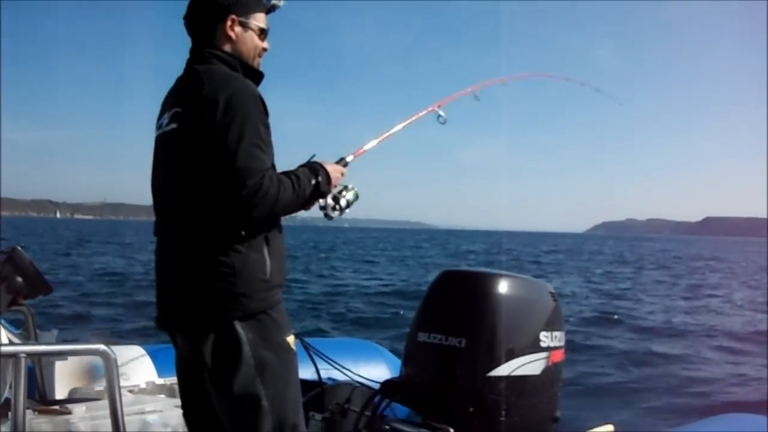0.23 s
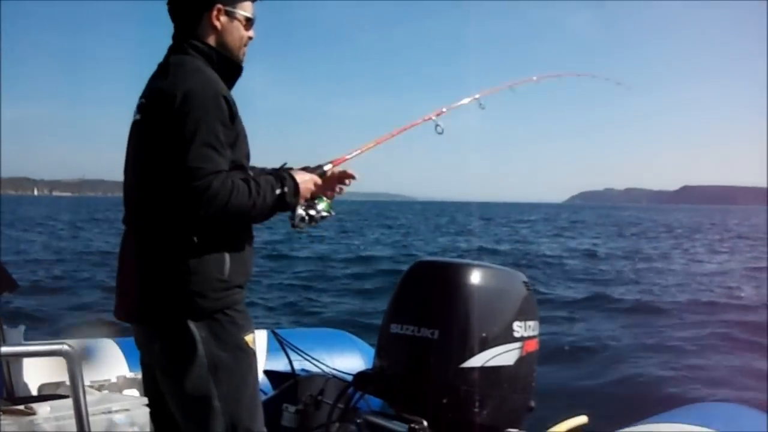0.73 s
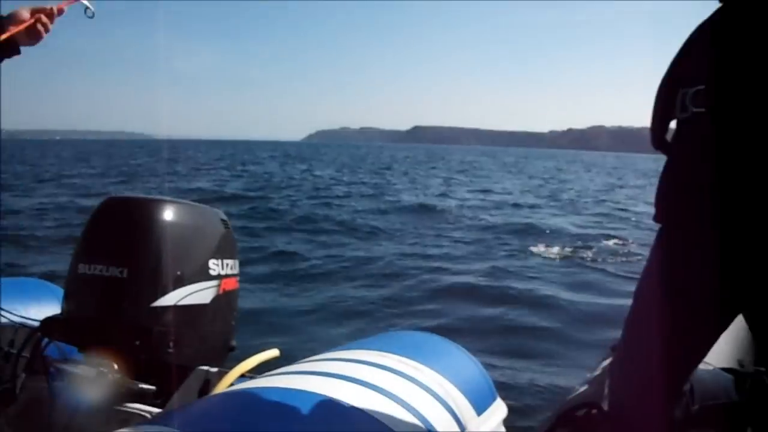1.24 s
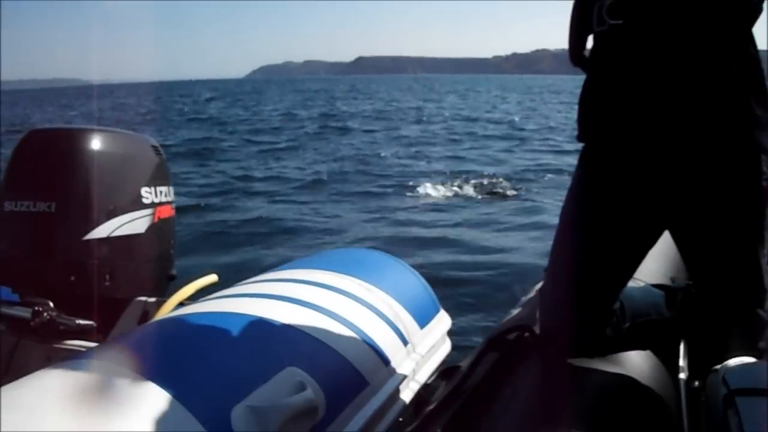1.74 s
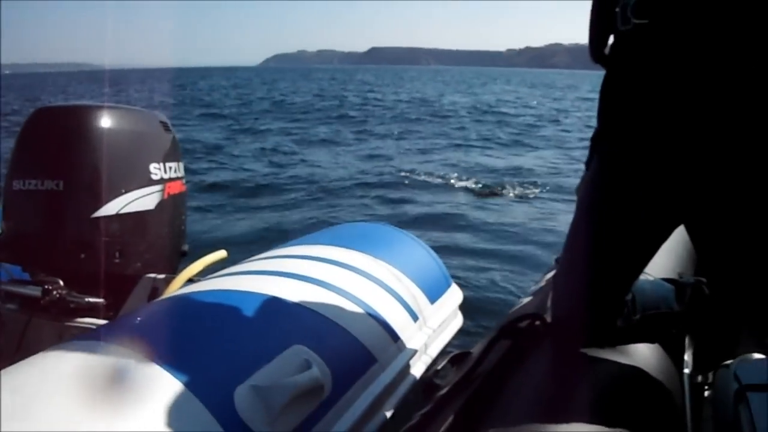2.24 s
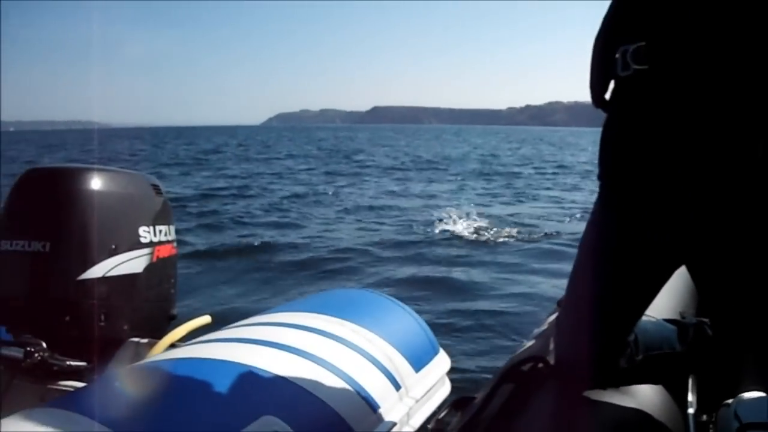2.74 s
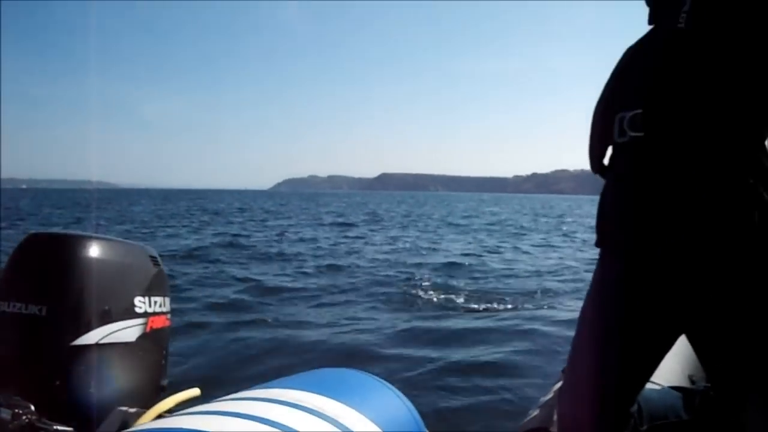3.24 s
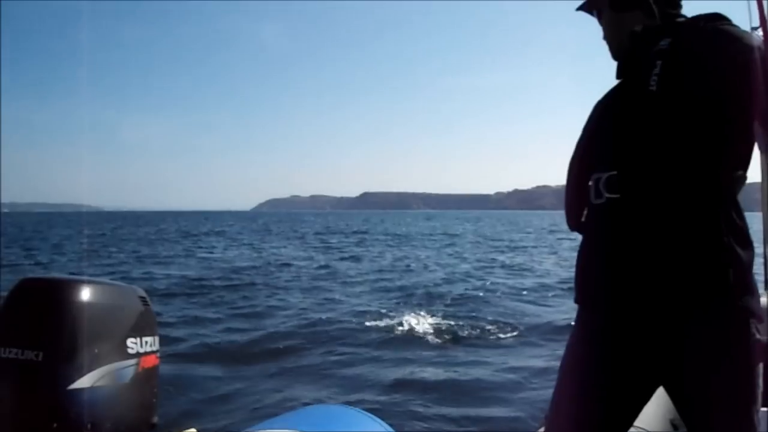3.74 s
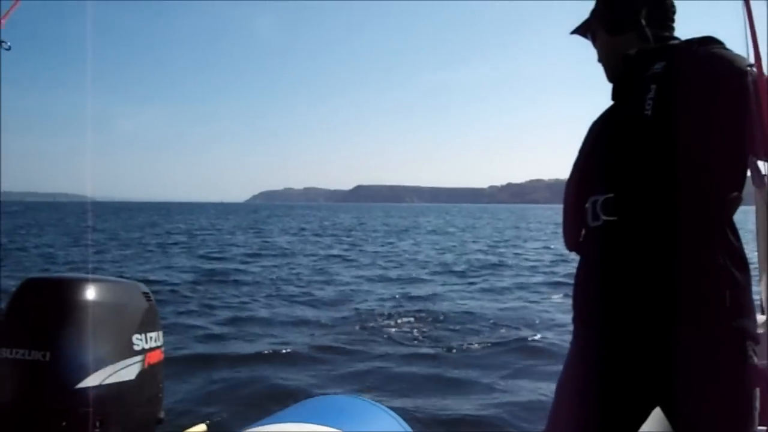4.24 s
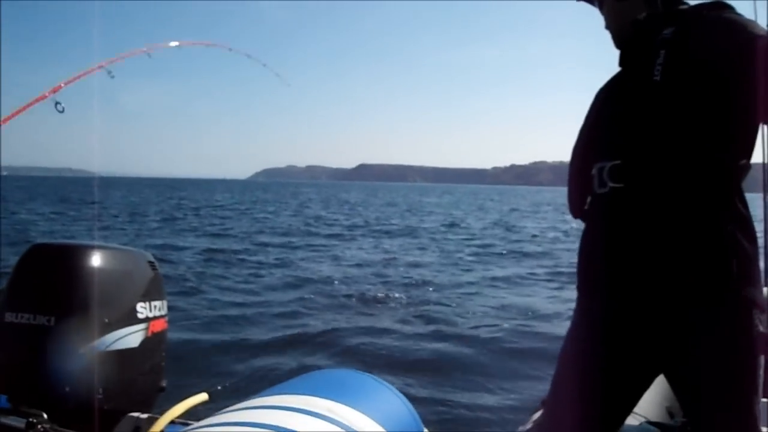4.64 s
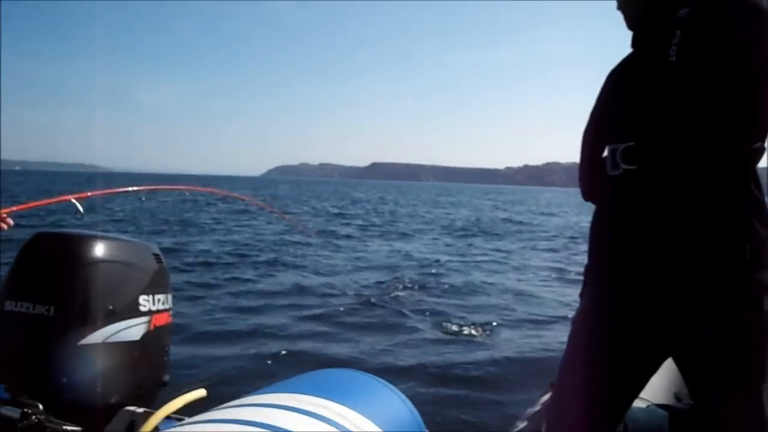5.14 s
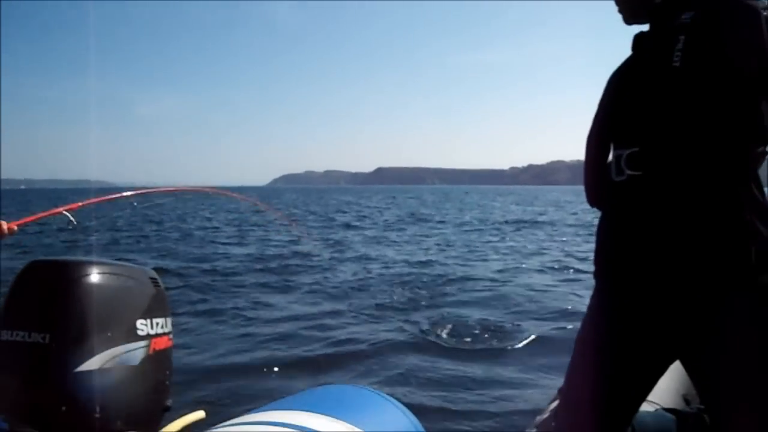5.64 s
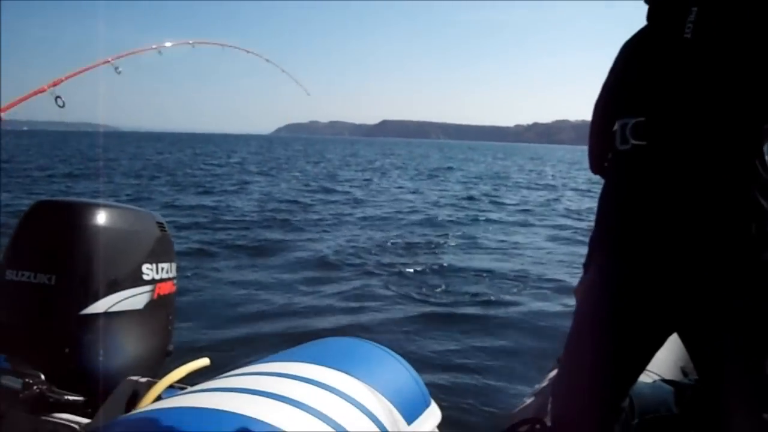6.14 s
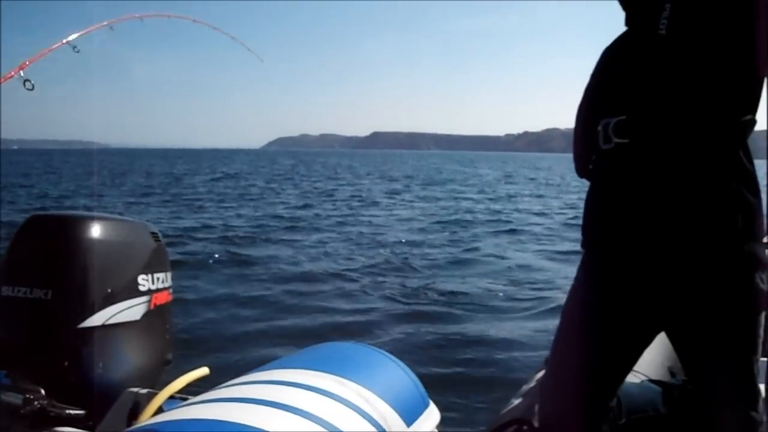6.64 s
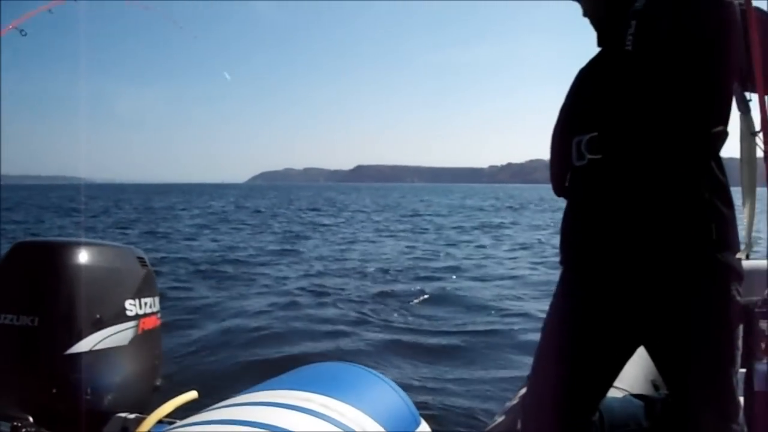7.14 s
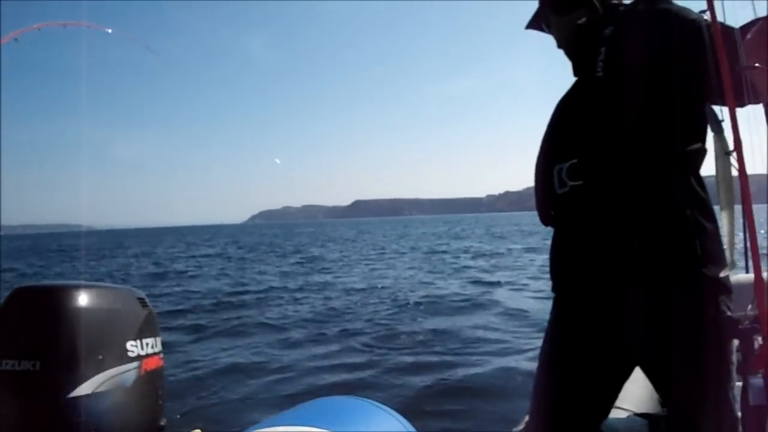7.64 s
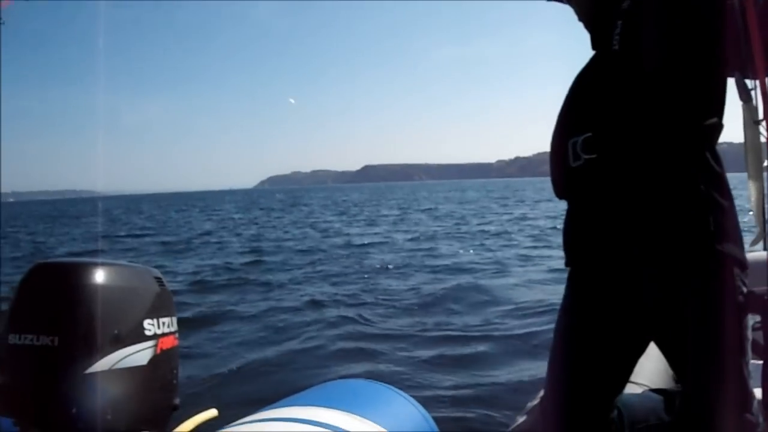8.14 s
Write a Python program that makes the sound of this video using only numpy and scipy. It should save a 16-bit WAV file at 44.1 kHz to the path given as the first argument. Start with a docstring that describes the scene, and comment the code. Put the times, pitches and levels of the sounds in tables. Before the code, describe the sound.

Mono handheld camera sound aboard a rubber boat: crisp, wet smacks and dense fizzy wash, occasional soft hollow thumps, and a cluster of clipping cracks early on that briefly makes the level duck. Later a second strong splash, gliding bubble blips, and a reel's drag buzzing twice. Sparse drips and laps close it, over light wind rumble, hiss and wavering electronic whine.

```python
"""Sharp smacks, fizzing wash, dull thumps and a reel that ratchets twice: chop slaps a small inflatable boat.
Noise grains ring many bands for the wash; noise bursts ring trapped air for the smacks; cracks are brief noise.
Bubbles are gliding sines, thumps low sines with a puff, the reel pawl ticks and hiss through resonances.
The small camera adds thin whines, hum and hiss; its gain control ducks after the loudest peaks."""
import sys
import numpy as np
from scipy import signal
from scipy.fft import rfft, irfft
from scipy.io import wavfile
from scipy.ndimage import minimum_filter1d

SR = 44100
rng = np.random.default_rng(int(sys.argv[2]) if len(sys.argv) > 2 else 0)


def dump_mix(stems):
    """Bounce the given channels to the path in sys.argv[1] as a 16-bit WAV at rate SR."""
    frames = np.atleast_2d(stems).T  # one column per channel
    limited = np.clip(frames, -1, 1)  # hard clip at full scale
    pcm = np.round(limited * 32767).astype(np.int16)
    wavfile.write(sys.argv[1], SR, pcm)


N = 369999
T = np.arange(N) / SR   # time [s]


def from_db(db):
    """Amplitude factor of a level in dB."""
    return 10 ** (np.asarray(db) / 20)


def rms_one(x):
    """Scales a signal to rms 1."""
    return x / np.sqrt(np.mean(x ** 2) + 1e-20)


def in_time(rows):
    """Columns of a curve, sample by sample."""
    s, *columns = np.transpose(rows)
    return [np.interp(T, s, column) for column in columns]


def at_hz(points, hz):
    """Reads a spectrum in dB, interpolated along log frequency."""
    points = np.array(points)
    return np.interp(np.log(hz), np.log(points[:, 0]), points[:, 1])


def drift(rate_hz):
    """Slow chance: noise at every 40th sample through a double one-pole low-pass; spread 1."""
    r = np.exp(-80 * np.pi * rate_hz / SR)
    noise = rng.standard_normal(N // 40 + 2002)
    slow = signal.lfilter([1], [1, -2 * r, r * r], noise)[2000:]   # settled part
    return np.interp(np.arange(N) / 40, np.arange(len(slow)), rms_one(slow))


def resonance(x, hz, width_hz):
    """Two-pole peak of gain 1."""
    r = np.exp(-np.pi * width_hz / SR)
    poles = [1, -2 * r * np.cos(2 * np.pi * hz / SR), r * r]
    return signal.lfilter([(1 - r * r) / 2, 0, (r * r - 1) / 2], poles, x)


def coloured(spectrum, white):
    """A signal given the colour of a spectrum; rms 1."""
    hz = np.maximum(np.fft.rfftfreq(N, 1 / SR), 1)
    return rms_one(irfft(rfft(white) * from_db(at_hz(spectrum, hz)), N))


def sine(hz):
    """A sine of rms 1 that follows a pitch curve from a random phase."""
    phase = 2 * np.pi * np.cumsum(hz + 0 * T) / SR
    return np.sqrt(2) * np.sin(phase + rng.uniform(0, 2 * np.pi))


def grains(per_s, spread_db):
    """Random clicks of very uneven size and either sign."""
    sizes = from_db(spread_db * np.minimum(rng.exponential(1, N), 5)) * rng.choice([-1, 1], N)
    return sizes * (rng.random(N) < per_s / SR) + 1e-18


def add(track, s, db, sound):
    """Lays a sound on the track, scaled to a peak level."""
    at = round(s * SR)
    track[at:at + len(sound)] += (from_db(db) * sound / np.abs(sound).max())[:N - at]


def smacks():
    """The blow and a dying burst of noise ring the pocket of trapped air and its overtone."""
    # smacks and drops: (time [s], peak level [dB], pitch [Hz], main burst t60 [s])
    smack_rows = [(0.1753, -18.5, 3590, 0.089), (0.6314, -14.5, 2580, 0.022), (0.839, -27, 2590, 0.029),
                  (0.914, -22.5, 2520, 0.021), (0.9793, -18.5, 2380, 0.048), (1.181, -17.5, 3850, 0.053),
                  (1.1985, -20, 3540, 0.022), (1.232, -22, 4200, 0.025), (1.3363, -24, 3150, 0.03),
                  (1.432, -23, 3920, 0.017), (1.6074, -31, 2050, 0.025), (1.665, -25, 3580, 0.027),
                  (1.7889, -25, 4200, 0.025), (1.8457, -25, 3000, 0.025), (1.8593, -20, 3100, 0.039),
                  (1.881, -14.5, 2600, 0.032), (2.0231, -8.5, 3140, 0.018), (2.0595, -13, 2600, 0.019),
                  (2.2034, -37, 2200, 0.022), (2.2172, 2.5, 4400, 0.0083), (2.3197, -29, 2020, 0.036),
                  (2.321, -6, 2380, 0.017), (2.797, -18, 2600, 0.031), (3.0073, -18.5, 2730, 0.025),
                  (3.1566, -23, 2870, 0.025), (3.267, -26, 2870, 0.02), (3.294, -14.5, 2960, 0.019),
                  (3.49, -21, 3250, 0.021), (3.6716, -25, 3840, 0.025), (3.709, -17, 3140, 0.025),
                  (3.7312, -24, 3200, 0.025), (3.7543, -15, 2620, 0.018), (3.7679, -11, 2640, 0.02),
                  (3.8068, -21, 2800, 0.025), (3.8724, -21, 2890, 0.025), (3.8948, -18, 3130, 0.034),
                  (3.9086, -14.5, 2670, 0.045), (3.942, -16.5, 2540, 0.025), (3.9923, -22, 2710, 0.036),
                  (4.5059, -11.5, 3700, 0.057), (4.5486, -11.5, 3500, 0.034), (4.59, -17.5, 2300, 0.041),
                  (4.65, -18, 3250, 0.029), (4.7355, -1.5, 3810, 0.015), (4.8152, -24, 4000, 0.029),
                  (4.9736, -27, 3130, 0.029), (5.0835, -20, 3050, 0.017), (5.1023, -19, 3280, 0.018),
                  (5.1486, -20, 4100, 0.039), (5.2355, -25, 2580, 0.05), (5.247, -17, 4170, 0.032),
                  (5.273, -25, 5200, .015), (5.283, -28, 4900, 0.014), (5.318, -24, 2770, 0.03),
                  (5.3926, -9, 3920, 0.06), (5.481, -15.5, 3820, 0.04), (5.599, -24.5, 1820, 0.02),
                  (5.7308, -23.5, 2940, 0.022), (5.8018, -24, 4480, 0.094), (5.849, -11.5, 2580, 0.034),
                  (6.073, -26, 2510, 0.032), (6.3991, -22, 2630, 0.062), (6.6498, -19, 2900, 0.029),
                  (7.2842, -18, 2200, 0.017), (7.3128, -29, 3100, 0.025), (7.336, -32, 2500, .015),
                  (7.347, -25.5, 2300, .015), (7.4078, -14.5, 2700, 0.014), (7.62, -31.5, 3400, .03),
                  (7.661, -27, 3600, .04), (7.8408, -25, 2580, 0.034), (7.9816, -24, 2170, 0.014),
                  (8.011, -30, 3100, .02), (8.05, -30, 4600, .02), (8.1378, -28, 3050, 0.028),
                  (8.18, -23, 4060, 0.022)]
    out, t = np.zeros(N), T[:4000]
    for (s, db, hz, t60), noise in zip(smack_rows, rng.standard_normal((len(smack_rows), 4000))):
        decay = from_db(-60 * t / t60) + 0.083 * from_db(-60 * t / 0.099)   # main burst and faint tail
        burst = noise * np.minimum(t / 0.0012, 1) * decay
        burst[20] += 6.0   # the blow
        low = resonance(resonance(burst, hz, hz / 3.35), hz, hz / 4.4)
        overtone_hz = 1.54 * hz
        high = resonance(resonance(burst, overtone_hz, hz / 6.8), overtone_hz, hz / 6.8)
        add(out, s, db, low - 0.2 * high)
    return out


def cracks():
    """A few milliseconds of broad noise, coloured around one pitch; stronger cracks last longer."""
    # dry bright cracks: (time [s], peak level [dB], pitch [Hz])
    crack_rows = [(1.9214, -25, 4140), (2.046, -23, 3560), (2.056, -14, 4050), (2.0599, -3, 4700),
                  (2.0674, -14, 3730), (2.0764, -23, 6120), (2.0908, -16, 4370), (2.2177, -2.5, 4350),
                  (2.2287, 0, 3100), (2.2294, -26, 11000), (2.239, -4.5, 5870), (2.2599, -8, 5830),
                  (2.2695, -9.5, 7300), (2.371, -20, 7950), (2.4917, -17.5, 7600), (2.5262, -23, 7950),
                  (2.5605, -17.5, 6560), (2.5679, -25, 7900), (4.5102, -5, 3900), (4.5151, -5, 4000),
                  (4.7356, -28, 3900), (5.7448, -19.5, 6460), (5.8022, -24, 4630), (6.3999, -24, 3650),
                  (6.5344, -24, 7910), (7.662, -32, 7850), (7.9808, -22, 5240), (8.042, -33, 7000),
                  (8.1807, -17, 9100), (8.2856, -27, 4600)]
    out, t = np.zeros(N), T[:1500]
    for (s, db, hz), noise in zip(crack_rows, rng.standard_normal((len(crack_rows), 1500))):
        t60 = 0.0086 + 0.0099 * from_db(db)   # seconds
        burst = noise * from_db(-60 * t / t60)
        broad = resonance(resonance(burst, 6300, 6600), 6300, 6600)
        add(out, s, db, resonance(burst, hz, hz / 5.2) + 0.36 * broad)
    return out


def wash():
    """Small bubbles burst densely, each ringing some cycles; fine spray ticks above them."""
    # lapping along the tubes: (time [s], fizz level [dB])
    lapping = [(0, -41.5), (1.3, -55.5), (2.2, -43.5), (4.3, -52), (5.5, -53), (8.39, -49.5)]
    # relative colour of the bursting bubbles: (frequency [Hz], density [dB per Hz])
    fizz_colour = [(530, -54), (900, -24), (1020, -45), (1630, -5), (2090, -0.5), (2610, 1), (3660, -1.5),
                   (4440, -2.5), (5700, -18.5), (7500, -15), (9750, -56), (16500, -120)]
    # relative colour of the spray: (frequency [Hz], density [dB per Hz])
    spray_colour = [(2940, -27), (5000, -10), (7070, -9), (8090, -3.5), (10600, -9.5), (12100, -10),
                    (15800, -29)]
    fizz_level = surge_level(column=1, base_db=in_time(lapping)[0])
    spray_level = surge_level(column=2, base_db=-52)
    fizz = 0
    for hz in np.geomspace(1100, 6500, num=20):
        clumps = from_db(1.9 * drift(41))   # each band flickers by itself
        bursts = resonance(resonance(grains(400., spread_db=3.5), hz, hz / 15.1), hz, hz / 1.5)
        band_gain = from_db(at_hz(fizz_colour, hz)) * np.sqrt(hz)   # bands widen with pitch
        fizz = fizz + band_gain * rms_one(bursts) * clumps
    together = from_db(1.97 * drift(41))   # flicker shared by fizz and spray
    ticks = rms_one(grains(2500., spread_db=2.5))
    spray = coloured(spray_colour, ticks + .8 * rng.standard_normal(N))
    return together * (fizz_level * rms_one(fizz) + spray_level * spray)


def surge_level(column, base_db):
    """Every wave rises to its crest and falls away; their powers add to the lapping."""
    # waves that break along the tubes; rise and fall each span 10 dB:
    # (crest time [s], fizz level [dB], spray level [dB], rise [s], fall [s])
    surges = [(.18, -43, -46, 0.087, 0.1), (.45, -38, -46, 0.039, 0.14), (.738, -32.5, -41.5, .3, 0.27),
              (1.01, -36.5, -45, 0.066, .1), (1.212, -32.5, -41.5, .08, 0.089),
              (1.492, -39, -48, 0.12, 0.028), (1.63, -40.5, -51, 0.13, 0.16),
              (1.871, -27.5, -39.5, 0.064, 0.076), (2.0, -30, -45, 0.16, 0.083),
              (2.065, -32.5, -36, .05, 0.039), (2.24, -25, -43, 0.0099, 0.028),
              (2.329, -19.5, -51, 0.0094, 0.0063), (2.534, -36.5, -37, 0.066, 0.042),
              (2.78, -36, -50, 0.12, .3), (3.048, -27.5, -44, 0.054, 0.18), (3.39, -41, -58, 0.081, 0.17),
              (3.597, -37, -55, 0.038, .08), (3.756, -30.5, -44, 0.053, 0.23),
              (3.94, -32.5, -42.5, 0.29, 0.3), (4.525, -34.5, -40.5, .06, 0.34),
              (4.79, -35.5, -40.5, 0.066, 0.12), (4.989, -44, -46, 0.045, .06),
              (5.128, -36, -43, 0.1, 0.52), (5.408, -45, -39, 0.068, 0.15), (5.617, -41, -60, 0.03, .06),
              (5.812, -38.5, -48, 0.1, 0.092), (6.415, -44, -46, 0.045, 0.087),
              (6.64, -41.5, -53, 0.11, 0.55), (7.044, -51, -58, 0.048, 0.14),
              (7.308, -43.5, -61, .1, 0.062), (7.872, -44, -55, 0.26, .08),
              (7.992, -43.5, -54, 0.041, 0.065)]
    power = from_db(2 * base_db)   # doubled dB gives power
    for row in surges:
        s, rise, fall = row[0], max(row[3], .005), max(row[4], .005)
        tens_of_db_down = np.maximum((s - T) / rise, (T - s) / fall)
        power = power + from_db(2 * row[column]) * 10 ** -tens_of_db_down
    return np.sqrt(power)


def bubbles():
    """Bubbles ring on as dying, fluttering sines, most of them rising as they near the surface."""
    # (time [s], peak level before flutter [dB], starting pitch [Hz], t60 [s], relative pitch rise [1/s])
    bubble_rows = [(2.798, -27, 1220, 0.031, 4), (3.055, -33, 1160, 0.039, 1.3),
                   (3.94, -29, 1380, 0.033, 3), (4.551, -23, 3400, 0.065, 2), (4.59, -28, 2240, .12, 4),
                   (4.655, -31, 2500, 0.091, 1), (4.662, -35, 3210, 0.054, 1.5),
                   (4.74, -28, 2800, 0.36, 0.8), (4.745, -24, 4700, 0.079, .6),
                   (4.815, -26, 4050, 0.087, 1.5), (4.814, -32, 4700, 0.16, 2.5),
                   (4.558, -34, 2620, .1, -.6), (4.835, -31, 2460, .08, 5), (5.52, -34, 1950, .04, 1.8),
                   (5.617, -31, 2140, .05, 1.8), (5.602, -43, 1760, 0.037, -3), (5.69, -32, 2500, 0.037, 5),
                   (6.075, -29.5, 2650, 0.076, 2), (7.311, -24, 3090, 0.045, 1.5),
                   (7.98, -29, 2020, 0.053, 2)]
    out, t = np.zeros(N), T[:8000]
    flutter = from_db(1.2 * drift(70))
    for s, db, hz, t60, rise in bubble_rows:
        fade = np.minimum(t / 0.0017, 1) * from_db(-60 * t / t60)
        add(out, s, db, fade * np.sin(2 * np.pi * hz * (t + rise * t * t / 2)))
    return flutter * out


def thumps():
    """The air-filled tube answers a soft push with a few cycles and a dull puff."""
    # thumps on the hull: (time [s], peak level [dB], pitch [Hz], t60 [s])
    thump_rows = [(0.419, -34, 300, 0.046), (.599, -24, 161, 0.028), (.845, -31, 595, 0.096),
                  (0.948, -28.5, 139, 0.085), (.985, -27, 202, 0.083), (1.041, -25.5, 420, 0.083),
                  (1.062, -21, 795, 0.0076), (2.215, -21.5, 168, 0.2), (2.315, -24.5, 184, 0.05),
                  (4.024, -28, 187, 0.072), (4.53, -25.5, 138, .2), (4.545, -33, 272, 0.13),
                  (5.689, -26.5, 643, 0.05), (5.845, -27, 165, 0.043), (6.463, -31, 573, 0.056),
                  (6.665, -28.5, 428, 0.057), (6.679, -28.5, 207, 0.054), (7.968, -29.5, 590, 0.042),
                  (8.312, -29.5, 150, .04)]
    out, t = np.zeros(N), T[:8000]
    for (s, db, hz, t60), noise in zip(thump_rows, rng.standard_normal((len(thump_rows), 8000))):
        swell = (1 - np.exp(-t / 0.00091)) * from_db(-60 * t / t60)
        puff = rms_one(resonance(resonance(noise, 1.4 * hz, 2.9 * hz), 1.4 * hz, 2.9 * hz))
        add(out, s, db, swell * (np.sin(2 * np.pi * hz * t) + 0.45 * puff))
    return out


def reel():
    """The pawl ticks over the teeth while line hisses off the spool; faster is louder."""
    # tugs on the reel's drag: (fastest time [s], extra clicks [1/s], swell time [s])
    tugs = [(5.159, 105, 0.05), (5.41, 170, 0.055)]
    # resonances of the drag: (frequency [Hz], width [Hz], relative gain [dB])
    drag_modes = [(8500, 1600, -6), (9460, 1300, -7), (11900, 1100, -4.5), (15100, 710, -18)]
    from_s, to_s, creep_per_s = 4.95, 5.54, 36
    tick_s = 0.0017   # decay time of a pawl tick's rattle
    per_s = creep_per_s + sum(extra * np.exp(-np.abs(T - s) / swell) for s, extra, swell in tugs)
    gain_db = -53 + 7 * np.log2(per_s / creep_per_s)   # 7 dB per doubling of speed
    teeth = np.diff(np.floor(np.cumsum(per_s / SR)), prepend=0)   # one click a tooth
    teeth = teeth * from_db(1.5 * rng.standard_normal(N))
    ticks = signal.lfilter([1], [1, -np.exp(-1 / (tick_s * SR))], teeth) * rng.standard_normal(N)
    line_hiss = per_s / 110 * rng.standard_normal(N)
    rub = rms_one(ticks) + line_hiss
    rung = sum(from_db(db) * resonance(resonance(rub, hz, width), hz, width)
               for hz, width, db in drag_modes)
    return (T > from_s) * (T < to_s) * from_db(gain_db) * rms_one(rung)


def camera():
    """Noise-fed hum, a tone switched with every frame, a wavering pair of sines and the two drives."""
    # wavering hum: (frequency [Hz], width [Hz], level [dB rms])
    hum_rows = [(76.7, 6.9, -60), (116.8, 4.4, -55), (176, 1.8, -54)]
    # wavering pair of tones: (time [s], lower pitch [Hz], lower level [dB rms], upper level [dB rms])
    # all are the centres that pitch and level waver around
    pair_curve = [(3.5, 3800, -70, -70), (4.2, 3760, -50, -53), (5.0, 3840, -49, -53),
                  (5.6, 3810, -46, -59), (6.3, 3820, -54, -61.5), (6.5, 3776, -52.5, -60),
                  (7.3, 3864, -56, -50), (7.7, 3790, -53, -52), (8.1, 3795, -57, -64),
                  (8.39, 3810, -49, -65)]
    hum = sum(from_db(db) * rms_one(resonance(rng.standard_normal(N), hz, width))
              for hz, width, db in hum_rows)
    sensor_hz, frame_hz, frame_middle_s = 7867.13, 30.027, .0134
    # half of each frame strong, the other half weak and of opposite sign
    reading = np.cos(2 * np.pi * frame_hz * (T - frame_middle_s)) > 0
    sensor = from_db(-41.5) * np.where(reading, 1, -0.4) * np.sin(2 * np.pi * sensor_hz * T)
    hz, lower_db, upper_db = in_time(pair_curve)
    upper_hz = hz + 60 + 6.7 * drift(4.67)
    upper = from_db(upper_db + 0.97 * drift(6.5)) * sine(upper_hz)
    lower = from_db(lower_db + 0.5 * drift(5.1)) * sine(hz + 5.9 * drift(5.05))
    drives = from_db(-54) * sum(drive(share) for share in (1.15, .65))   # shares of the shake
    return hum + sensor + lower + upper + drives


def drive(share):
    """A whine swung about its resting pitch by the tremor of the hand, fainter the further it swings."""
    # hand shake moving the lens-steadying drives:
    # (time [s], swing before the drive's share and dead zone [Hz rms])
    shake = [(0, 120), (.3, 200), (.55, 450), (.75, 150), (.95, 300), (1.1, 150), (1.25, 420), (1.6, 130),
             (2.4, 110), (2.6, 300), (2.8, 120), (3.65, 150), (3.9, 480), (4.2, 480), (4.45, 200),
             (4.95, 450), (5.3, 220), (5.8, 500), (6.25, 180), (7.15, 80), (7.65, 160), (8.39, 200)]
    rest_hz, dead_zone_hz = 11719, 50   # a drive rests until the shake exceeds the dead zone
    tremor = rms_one(resonance(drift(12), 8.5, 7))   # centred on 8.5 Hz
    swing = share * in_time(shake)[0] * tremor
    swing = swing - np.clip(swing, -dead_zone_hz, dead_zone_hz)
    level_db = -2.5 * np.minimum(np.abs(swing) / 300, 1) + 1.5 * drift(12)
    return from_db(level_db) * sine(rest_hz + swing)


def wind_and_hiss():
    """Coloured noise for wind, far sea and circuit hiss; its rumble swells and eases with the wind."""
    # relative colour: (frequency [Hz], density [dB per Hz])
    hiss_colour = [(12, -32), (20, 8.5), (177, 1), (222, -1.5), (1190, -10.5), (3530, -20.5), (3840, -10),
                   (4670, -24), (6540, -22), (7310, -27), (7950, -42), (8650, -14.5), (11100, -27),
                   (12100, -24), (16000, -22.5)]
    # the wind's rumble: (time [s], gain [dB])
    wind = [(0, 1.5), (1.2, 1), (2.3, 2.5), (3.3, -0.5), (4.6, 1), (5.6, 0.5), (6.5, -2), (7.4, -1.5),
            (8.39, -1)]
    hiss = from_db(-41.5 + 0.61 * drift(1.1)) * coloured(hiss_colour, rng.standard_normal(N))
    rumble = signal.sosfilt(signal.butter(1, 298, fs=SR, output="sos"), hiss)   # low-pass, Hz
    return hiss + (from_db(in_time(wind)[0]) - 1) * rumble


def scene():
    """Water, boat, reel, camera and background summed to one channel."""
    water = wash() + smacks()
    water = water + .5 * resonance(water, 2700, 190)   # the cavity behind the microphone hole
    return (water + cracks() + bubbles() + thumps() + reel() + camera() + wind_and_hiss())[None]


def record(dry):
    """Gain control drops just after a loud peak, holds, and creeps back; peaks clip; the top is cut."""
    over_db = np.maximum(20 * np.log10(np.abs(dry[0]) + 1e-9) + 4.95, 0)   # above -4.95 dB
    hold = round(.22 * SR)
    # running maximum over the past hold time
    held_db = -minimum_filter1d(-over_db, size=hold, origin=(hold - 1) // 2, mode="constant")
    fall = T / 0.33   # the cut in dB dies away exponentially
    cut_db = np.exp(np.maximum.accumulate(np.log(held_db + 1e-6) + fall) - fall)
    r = np.exp(-1 / (.004 * SR))   # the cut sets in over some 4 ms
    cut_db = signal.lfilter([1 - r], [1, -r], cut_db)
    level = np.clip(dry * from_db(-cut_db), -1, 1)
    return signal.sosfilt(signal.ellip(12, .5, 70, 15740, fs=SR, output="sos"), level)


dry = scene()
out = record(dry)
dump_mix(out)
```